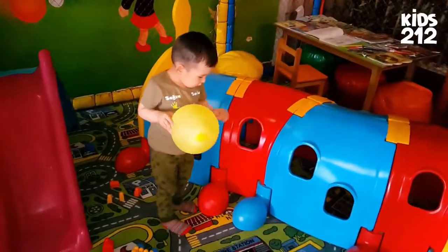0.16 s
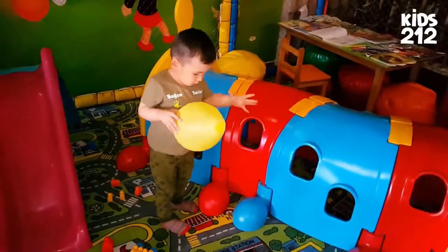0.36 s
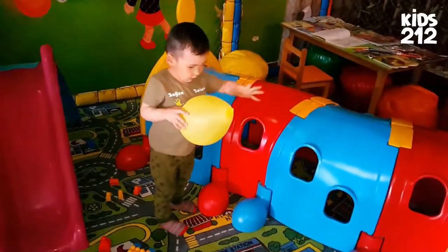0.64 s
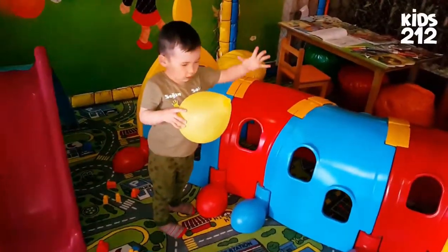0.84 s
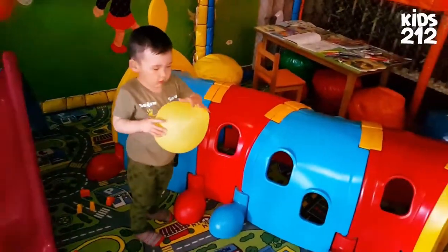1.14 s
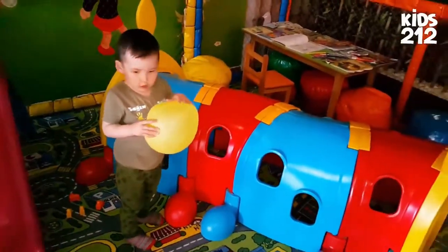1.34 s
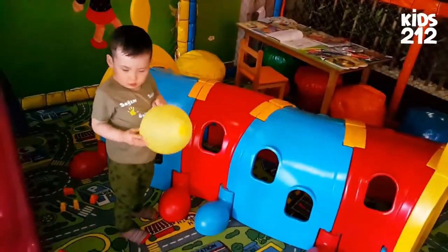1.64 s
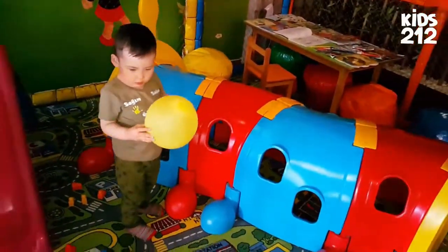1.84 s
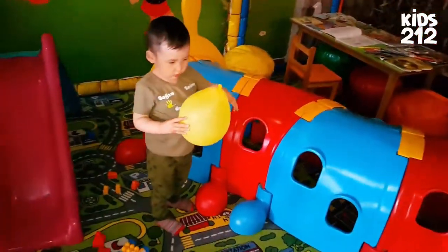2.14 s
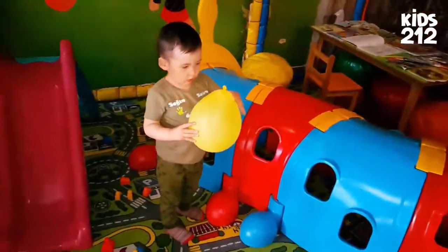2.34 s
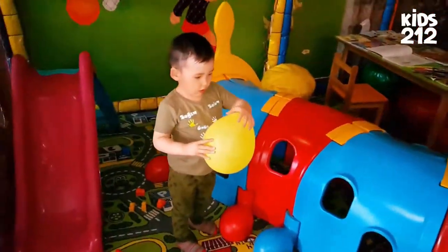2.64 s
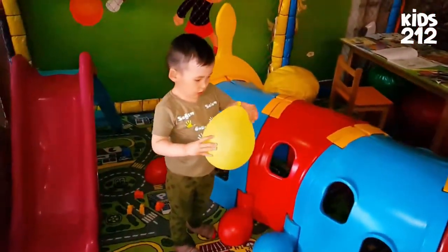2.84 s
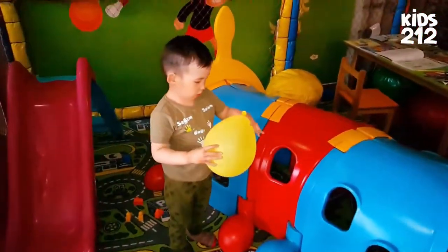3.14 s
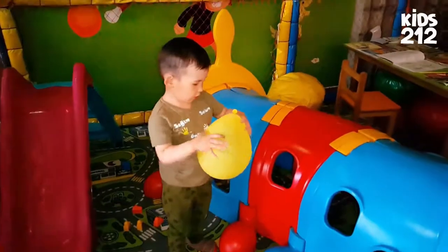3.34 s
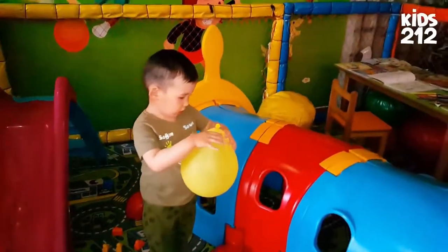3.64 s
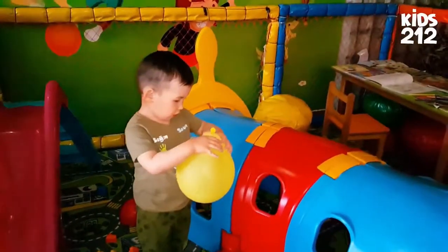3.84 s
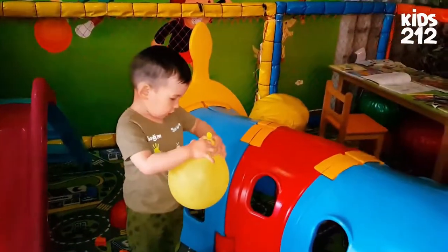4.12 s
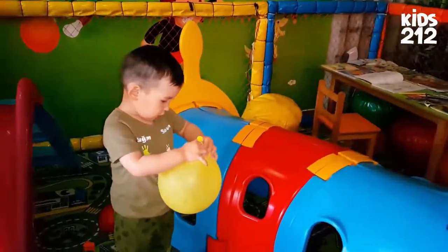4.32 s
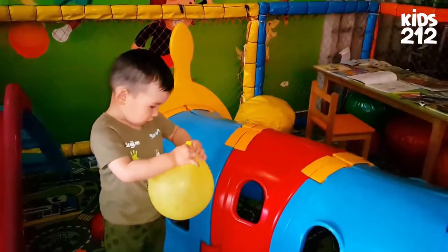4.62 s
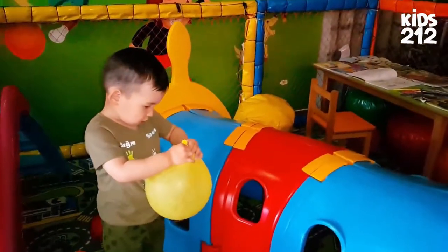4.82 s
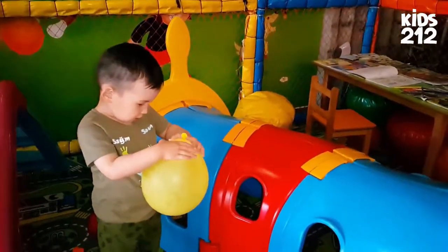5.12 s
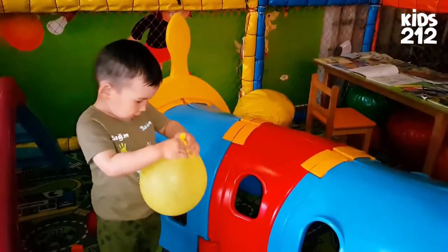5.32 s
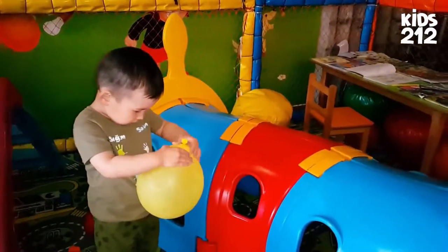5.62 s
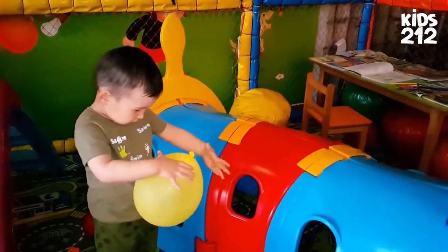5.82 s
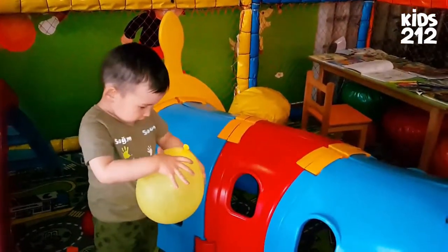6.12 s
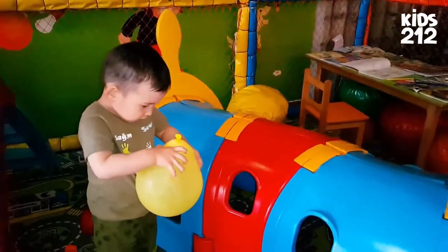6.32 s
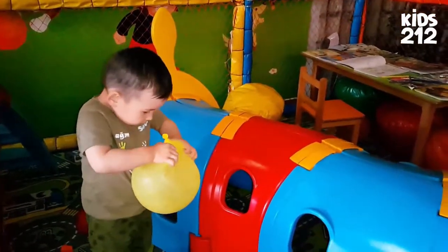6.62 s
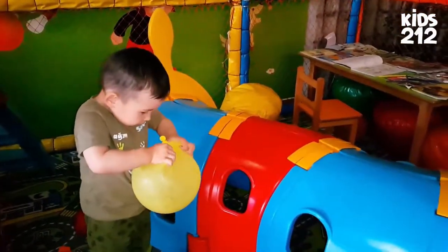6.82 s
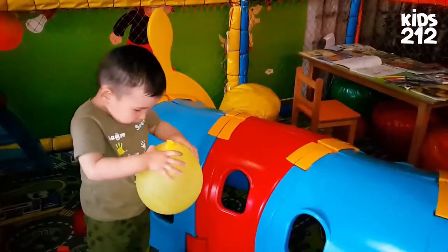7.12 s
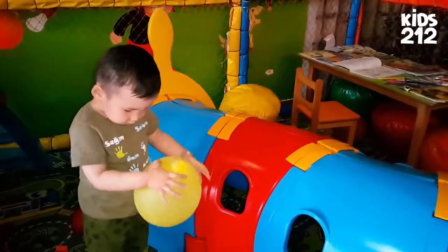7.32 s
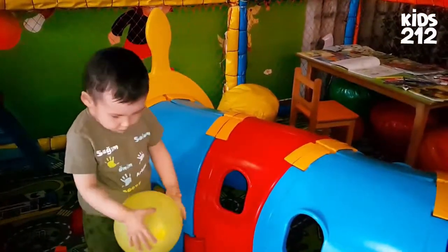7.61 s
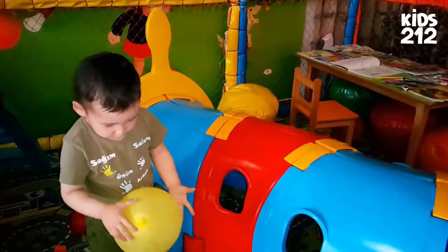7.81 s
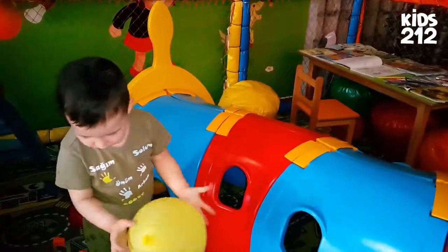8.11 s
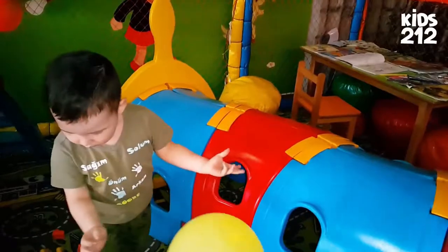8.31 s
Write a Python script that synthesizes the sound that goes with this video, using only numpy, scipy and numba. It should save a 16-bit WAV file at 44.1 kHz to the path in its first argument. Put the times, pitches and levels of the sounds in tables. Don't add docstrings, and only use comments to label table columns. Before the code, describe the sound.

A firm pat dies away, then near quiet. Fingers creak on a taut rubber balloon, building to a loud, hollow thump. Faint squeaks and soft pats follow, then a sharp scratchy burst with a hoarse squeak, scattered chirps and dry rubs, and another booming knock. Close stereo microphone, brighter on the left, in a small hard-walled playroom with a faint low murmur.

```python
import sys
import numpy as np
from scipy import signal
from scipy.fft import rfft, irfft, next_fast_len
from scipy.io import wavfile
from scipy.ndimage import uniform_filter1d
from numba import njit

SR = 44100
rng = np.random.default_rng(int(sys.argv[2]) if len(sys.argv) > 2 else 0)


def gain_from_decibels(decibels):
    exponent = np.asarray(decibels, float) / 20
    return 10 ** exponent


def put_to_file(sound):
    columns = np.atleast_2d(sound).T
    safe = np.clip(columns, -1, 1)
    whole_steps = np.round(safe * 32767)
    wavfile.write(sys.argv[1], SR, whole_steps.astype(np.int16))


N = 373071
LEAD = SR // 4


def at_hz(points, hz):
    f, v = np.transpose(points)
    return np.interp(np.log(np.maximum(hz, 1)), np.log(f), v)


def rms_one(x):
    return x / np.sqrt(np.mean(x ** 2) + 1e-20)


def shape(x, points):
    size = next_fast_len(x.shape[-1], True)
    hz = np.arange(size // 2 + 1) * SR / size
    return irfft(rfft(x, size) * gain_from_decibels(at_hz(points, hz)), size)[..., :x.shape[-1]]


def butter(x, order, hz, kind="low"):
    return signal.sosfilt(signal.butter(order, hz, kind, fs=SR, output="sos"), x)


def low_part(x, hz):
    return signal.sosfiltfilt(signal.butter(2, hz, fs=SR, output="sos"), x)


def peak(x, hz, width_hz):
    r = np.exp(-np.pi * width_hz / SR)
    poles = [1, -2 * r * np.cos(2 * np.pi * hz / SR), r * r]
    return signal.lfilter([(1 - r * r) / 2, 0, (r * r - 1) / 2], poles, x)


@njit
def moving_peak(x, turn, r):
    y = np.zeros(len(x))
    for i in range(2, len(x)):
        drive = (1 - r[i] ** 2) / 2 * (x[i] - x[i - 2])
        y[i] = drive + 2 * r[i] * np.cos(turn[i]) * y[i - 1] - r[i] ** 2 * y[i - 2]
    return y


def flutter(size, per_s):
    knots = int(size * per_s / SR) + 2
    return np.interp(np.arange(size) * per_s / SR, np.arange(knots), rng.standard_normal(knots))


def add_at(out, s, burst):
    out[..., LEAD + round(s * SR):][..., :burst.shape[-1]] += burst


# frequency in Hz, side minus mid in dB.
DIFFUSE_SIDE_DB = [(60, -12), (110, -15.5), (200, -15.5), (380, -7.5), (700, -1.5), (1290, 2), (2380, 0.5),
                   (4400, -1), (8120, -1), (15000, 2)]


def diffuse(mid, side):
    side = shape(side, DIFFUSE_SIDE_DB)
    return np.array([mid + side, mid - side])


# frequency in Hz, level in dB per Hz.
MURMUR_COLOUR = [(20, -30), (40, -20), (80, 0), (130, -1.5), (230, 4), (330, -0.5), (500, -6.5),
                 (800, -6.5), (1300, -9.5), (2500, -14.5), (4500, -22), (8000, -34.5), (16000, -31.5)]
# time in seconds, level in dB.
MURMUR_LEVEL_DB = [(0, -75), (1.2, -68.5), (2.098, -68.5), (3.002, -66), (3.798, -59.5), (4.6, -61),
                   (5.5, -62), (6.398, -63), (7.499, -61), (8.46, -66.5)]


def murmur():
    noise = rms_one(diffuse(*shape(rng.standard_normal((2, N)), MURMUR_COLOUR)))
    low = low_part(noise, 420)
    knots = np.arange(0, N + 4000, 4000)
    breath = np.interp(np.arange(N), knots, rng.standard_normal(len(knots)))
    s, db = np.transpose(MURMUR_LEVEL_DB)
    swell_db = np.interp(np.arange(N) / SR, s, db - db[0]) + 0.72 * breath
    upper_db = 3.5 + 0.74 * swell_db
    return gain_from_decibels(db[0] - 1.0) * (low * gain_from_decibels(swell_db) + (noise - low) * gain_from_decibels(upper_db))


# frequency in Hz, left minus right port in dB.
PORT_BALANCE_DB = [(100, -3.5), (500, 0.5), (1500, 1.5), (3000, 0), (6000, 11), (10000, 13), (15000, 7)]
# frequency in Hz, decay time t60 in seconds.
WALL_T60 = [(100, 1), (260, 0.5), (700, 0.4), (1840, 0.37), (4850, 0.34), (12800, 0.34)]


def playroom(x):
    onset_ms = 2.0
    t = np.arange(SR) / SR
    white, tail = rng.standard_normal((2, SR)), 0
    edges = np.geomspace(40, 19000, 15)
    for low, high in zip(edges, edges[1:]):
        t60 = at_hz(WALL_T60, np.sqrt(low * high))
        decay_db = -40 * t / t60 - 324 * t ** 2
        tail = tail + butter(white, 2, [low, high], "band") * gain_from_decibels(decay_db)
    tail = tail * np.clip(t * 1000 / onset_ms - .5, 0, 1)
    tail = diffuse(*(tail / np.sqrt(np.sum(tail[0] ** 2))))
    tail[1] = shape(tail[1], np.array(PORT_BALANCE_DB) * [1, -.8])
    return signal.fftconvolve(x[None], tail, axes=1)[:, :len(x)]


def ports(x):
    lag_samples = 4
    half = np.array(PORT_BALANCE_DB) * [1, .5]
    right = np.roll(shape(x, half * [1, -1]), lag_samples)
    return np.array([shape(x, half), right])


# frequency in Hz, width in Hz, level in dB.
BALLOON_MODES = [(290, 30, 4.5), (415, 21, 10), (488, 13, -2), (715, 22, 13), (826, 15, 7),
                 (1010, 260, -13.5), (1900, 37, -3.5), (2400, 150, -22), (3662, 140, -37),
                 (4720, 2700, -13)]


def body(x):
    x = butter(x, 1, 150, "high")
    modes = 0
    for k, (hz, width_hz, db) in enumerate(BALLOON_MODES):
        modes = modes + gain_from_decibels(db - 10.0) * peak(x, hz, width_hz) * (-1) ** k
    return x + modes


# start in seconds, length in seconds, level in dB, frequency in Hz, width in Hz.
FINGERTIP_SQUEALS = [(0.932, 0.076, -66, 8050, 900), (1.941, 0.0055, -37.5, 3360, 760),
                     (2.345, 0.07, -72, 8000, 1300), (2.345, .05, -68, 15000, 900),
                     (2.482, 0.077, -59.5, 6310, 1600), (2.48, 0.066, -58, 14800, 3200),
                     (2.482, 0.074, -61, 8100, 1300), (2.48, 0.065, -58.5, 13300, 3000),
                     (2.849, 0.03, -77.5, 14900, 760), (2.854, 0.049, -72.5, 7720, 900),
                     (5.508, 0.035, -60.5, 11500, 5000), (3.705, 0.08, -74, 15000, 900),
                     (3.178, 0.019, -42.5, 4930, 760), (6.912, 0.051, -48, 6030, 760),
                     (8.2, .06, -56.5, 2900, 760), (6.988, 0.023, -49.5, 3900, 760),
                     (6.5, 0.055, -46.5, 4550, 760), (6.5, 0.059, -52.5, 5590, 780),
                     (7.655, .04, -57.5, 4550, 760), (1.2, .07, -50, 4395, 760)]


def squeals():
    out = np.zeros(LEAD + N + SR)
    t = np.arange(8192) / SR
    for s, length_s, db, hz, width_hz in FINGERTIP_SQUEALS:
        band = peak(peak(rng.standard_normal(8192), hz, width_hz), hz, width_hz)
        swell = np.clip(t / 0.012, 0, 1) * np.exp(-(t / length_s) ** 2)
        add_at(out, s, gain_from_decibels(db) * rms_one(band) * swell)
    return out


# start in seconds, level in dB, frequency in Hz, t60 in seconds.
AIR_BOOMS = [(1.465, -33, 422, 0.21), (1.503, -24.5, 435, 0.26), (1.59, -8.5, 415, 0.34),
             (1.59, -17, 826, 0.38), (1.592, -19.5, 290, 0.36), (1.6, -28.5, 112, 0.18),
             (7.04, -21.5, 480, 0.15), (7.088, -10, 487, 0.25), (7.09, -22, 415, 0.23),
             (7.09, -35.5, 90, 0.23), (5.458, -38, 513, 0.32), (5.458, -31.5, 960, 0.19),
             (5.46, -43, 187.5, .2), (3.688, -50, 700, 0.14), (3.762, -41, 630, 0.19),
             (3.85, -58, 588, 0.98), (4.304, -31.5, 705, 0.081)]


def booms():
    out = np.zeros(LEAD + N + SR)
    t = np.arange(SR // 2) / SR
    for s, db, hz, t60 in AIR_BOOMS:
        width_hz = hz * .22
        band = peak(peak(rng.standard_normal(len(t)), hz, width_hz), hz, width_hz)
        add_at(out, s, gain_from_decibels(db - 3.0 - 60 * t / t60) * np.clip(t / 0.0044, 0, 1) * rms_one(band))
    return out


# start in seconds, length in seconds, level in dB, first and last slip rate in Hz.
SKIN_SINGS = [(1.196, 0.094, -52, 1034, 1040), (4.655, 0.083, -25.5, 1176, 1128),
              (4.73, .05, -31.5, 947, 1000), (4.948, .022, -46, 2293, 1784),
              (4.964, 0.045, -43, 1900, 2535), (6.6557, .007, -20.5, 994, 964),
              (5.164, 0.029, -46.5, 1076, 981), (5.809, 0.029, -36, 1058, 996),
              (7.401, 0.043, -39, 953, 1270), (7.468, 0.075, -38, 1232, 1359), (4.66, .12, -38, 770, 721),
              (7.561, 0.07, -41.5, 4610, 4320), (7.985, 0.037, -44.5, 1144, 1640),
              (8, 0.02, -48, 1790, 2200), (8.012, 0.028, -50.5, 1900, 2290),
              (3.305, 0.045, -64.5, 2540, 2370)]
SING_PARTIAL_LEVELS = [3.5, 1.5, -7, -17.5, -21.5]


def sings():
    waver, lumps_db = 0.055, 7.5
    out = np.zeros(LEAD + N + SR)
    t = np.arange(6144) / SR
    for s, length_s, db, first_hz, last_hz in SKIN_SINGS:
        share = np.clip(t / length_s, 0, 1)
        hz = (first_hz + (last_hz - first_hz) * share) * (1 + waver * flutter(6144, 600))
        phase = 2 * np.pi * np.cumsum(hz) / SR
        note = np.zeros(6144)
        for k, partial_db in enumerate(SING_PARTIAL_LEVELS, 1):
            if k * first_hz < 9000:
                note += gain_from_decibels(partial_db + lumps_db * flutter(6144, 250)) * np.sin(k * phase)
        add_at(out, s, gain_from_decibels(db) * rms_one(note) * np.sin(np.pi * share).clip(0) ** 0.36)
    return out


# start in seconds, peak level in dB, ring frequency in Hz, ring time in ms.
SKIN_JERKS = [(1.4491, -12, 1510, 2.0), (1.4648, -14, 1300, 2.0), (1.4762, -11, 1560, 1.8),
              (1.5013, -6, 1280, 2.3), (1.5034, -6, 2310, 2.5), (1.5056, -9, 1040, 3.0),
              (1.5405, -6, 800, 2.5), (1.5416, -9, 2230, 1.7), (1.5875, -3, 716, 60.0),
              (1.5995, -4, 826, 8.0), (3.3875, -24.5, 5800, 1.6), (3.3875, -33.5, 3400, 3.1),
              (3.3903, -27, 5600, 2.0), (4.304, -5.5, 2100, 1.0), (4.3066, -8, 1810, 1.1),
              (4.3092, -9, 1490, 1.3), (4.4115, -19.5, 1505, 1.5), (5.0268, -26, 1680, 2.0),
              (5.03, -24, 1800, 1.4), (5.0446, -27, 1810, 1.5), (5.049, -26, 1800, 1.5),
              (5.457, -22.5, 910, 1.5), (5.4595, -19, 950, 2.5), (5.4753, -27, 998, 1.9),
              (5.482, -25, 900, 3.0), (5.7715, -30, 2050, 1.5), (5.7791, -22, 2010, 1.6),
              (5.789, -25, 2000, 2.0), (5.7948, -22, 1900, 1.5), (5.7994, -22.5, 1950, 1.1),
              (5.8058, -25, 1950, 1.5), (5.812, -22, 1800, 1.5), (5.8188, -25, 1990, 2.0),
              (5.8462, -11.5, 1500, 1.0), (5.8497, -11, 1200, 1.2), (5.8523, -10.5, 2333, 4.0),
              (5.8536, -9, 1070, 3.0), (6.6135, -28, 1500, 2.5), (6.6305, -24, 1490, 2.0),
              (6.6578, -9, 1900, 3.4), (6.658, -12.5, 1100, 3.9), (6.6598, -14, 2880, 3.5),
              (6.678, -17, 1900, 2.0), (7.0744, -10, 560, 3.5), (7.0863, -4, 1150, 2.0),
              (7.0925, -2, 1952, 8.0), (7.8225, -50, 1200, 4.0)]
# multiple of the ring frequency, level in dB.
JERK_RING_PARTIALS = [(1.0, 0.0), (1.7, -10), (2.6, -13), (3.7, -18), (5.3, -24)]


def jerks():
    shorter, blur_ms = .65, 0.27
    out = np.zeros((2, LEAD + N + SR))
    t = np.arange(4096) / SR
    for s, db, hz, ms in SKIN_JERKS:
        partials = np.zeros(4096)
        for k, partial_db in JERK_RING_PARTIALS:
            if k * hz < 8000:
                partials += gain_from_decibels(partial_db) * np.sin(2 * np.pi * k * hz * t) * np.exp(-t * 300 * (k - 1))
        rings = []
        for tau_ms in (ms * shorter, blur_ms):
            swell = (1 - np.exp(-t * hz * 2.5)) * np.exp(-t * 1000 / max(tau_ms, .1))
            rings.append(swell / swell.max() * partials)
        rings[1] *= np.sqrt(min(ms, 3.0) * shorter / blur_ms)
        add_at(out, s, gain_from_decibels(db - 3.5) * np.array(rings))
    return butter(out + 1e-18, 2, 350, "high")


# strongest pressure in seconds, rise in seconds,
# fall in seconds, level in dB, skin resonance in Hz.
SQUEEZE_RUBS = [(1.6, 0.013, .05, -15, 744), (1.65, .05, 0.15, -16, 960), (1.485, .1, .03, -29, 2500),
                (4.306, 0.002, 0.03, -19, 1790), (4.34, .02, .06, -31.5, 1700),
                (5.459, 0.002, 0.073, -34.5, 950), (6.52, 0.049, 0.4, -42.5, 2300),
                (6.66, 0.003, .005, -26, 1780), (7.092, .02, .02, -4, 699.4),
                (7.14, .05, 0.12, -21.5, 1300), (3.692, .006, .12, -45, 2600), (3.775, .04, .12, -47, 1800),
                (5.67, .012, .1, -60, 3500)]
PALM_SWEEPS = [(1.21, 0.017, .12, -39.5, 2303), (1.255, 0.034, .04, -40, 2100),
               (1.44, .2, 0.0058, -39, 2171), (2.485, .01, 0.09, -61.5, 1996),
               (4.69, 0.052, 0.13, -20.5, 2400), (4.8, .05, 0.12, -36, 2202),
               (4.955, 0.008, 0.1, -45, 2237), (5.028, .004, .02, -39.5, 1800),
               (5.747, .006, 0.085, -45, 2116), (6.177, .006, .08, -42, 2099),
               (6.34, .05, 0.07, -52.5, 1824), (6.6, 0.097, 0.088, -38.5, 1994),
               (6.93, .02, 0.054, -56, 2960), (7.032, 0.0054, 0.14, -21, 1900),
               (7.505, .02, 0.12, -40, 1320), (7.62, .04, 0.027, -44, 4500),
               (7.67, 0.022, 0.048, -62, 4500), (8.01, .025, 0.08, -61, 2400), (3.69, .005, .03, -65, 2500),
               (3.78, .04, 0.06, -68.5, 1600), (3.875, .012, 0.05, -70, 2000),
               (3.56, 0.0092, 0.048, -59.5, 3500), (1.33, .06, 0.068, -43.5, 1200),
               (6.56, 0.059, 0.035, -37.5, 2500)]
LIGHT_STROKES = [(3.184, 0.019, .05, -38.5, 2399), (3.25, 0.024, .08, -48.5, 2302),
                 (3.046, 0.011, 0.064, -51, 1485), (3.0, .03, 0.085, -62.5, 1187),
                 (3.15, .04, 0.029, -52, 1309), (5.04, 0.031, 0.071, -39, 1700),
                 (5.095, .04, .03, -39.5, 2052), (6.2, 0.036, 0.035, -34.5, 2400),
                 (6.23, 0.026, 0.19, -48, 1676), (7.508, 0.044, 0.034, -34, 1343),
                 (7.585, 0.051, .07, -34, 5206)]
DAMP_SQUEAKS = [(2.27, 0.023, .05, -60.5, 2028), (2.4, 0.026, 0.049, -50.5, 2483),
                (2.78, .01, .08, -62, 1584), (3.31, 0.022, .05, -49, 2650), (3.45, 0.013, .1, -52, 1304),
                (3.772, .02, 0.037, -45, 659.6), (4.965, .02, .04, -47.5, 2510),
                (5.03, 0.01, .04, -38.5, 1789), (5.172, 0.015, .03, -51, 1197),
                (5.782, 0.033, .06, -36.5, 2150), (5.822, .06, .03, -35, 2096),
                (7.418, .02, .02, -35, 2300), (7.432, .02, 0.044, -37.5, 2400),
                (8.04, .03, 0.098, -46.5, 2598)]


def pressure(size):
    fade_db, eased_hiss_db_per_db = 20, 0.31
    kinds = [(SQUEEZE_RUBS, -23.5, -7), (PALM_SWEEPS, -1, -8.5),      # rows, hiss dB, squeak dB
             (LIGHT_STROKES, -14.5, 8.5), (DAMP_SQUEAKS, -32, 25)]
    t = (np.arange(size) - LEAD) / SR
    level, bright, squeak = np.zeros((3, size))
    centre_hz = np.full(size, 1500.)
    for rows, hiss_db, squeak_db in kinds:
        for s, rise_s, fall_s, db, hz in rows:
            at = np.arange(*np.searchsorted(t, [s - rise_s, s + fall_s]))
            eased_db = fade_db * np.maximum((s - t[at]) / rise_s, (t[at] - s) / fall_s)
            finger_hiss_db = db + hiss_db - (1 - eased_hiss_db_per_db) * eased_db
            bright[at] = np.maximum(bright[at], gain_from_decibels(finger_hiss_db))
            leads = gain_from_decibels(db - eased_db) > level[at]
            at, eased_db = at[leads], eased_db[leads]
            level[at] = gain_from_decibels(db - eased_db)
            centre_hz[at] = hz
            squeak[at] = gain_from_decibels(squeak_db)
    return level * gain_from_decibels(-2), centre_hz, bright / np.maximum(level, 1e-9), squeak


def rubs():
    slips_per_s, lumps_db, broad_q, locked_q = 2500, 2.5, 1.0, 4.5
    size = LEAD + N + SR
    level, centre_hz, bright, squeak = pressure(size)
    catches = gain_from_decibels(lumps_db * flutter(size, 300))
    level = uniform_filter1d(level, 130) * catches
    grains = rms_one((rng.random(size) < slips_per_s / SR) * rng.choice([-1, 1], size))
    turn = 2 * np.pi * centre_hz / SR
    even = np.sqrt(1500 / centre_hz)

    def skin(ratio, q):
        w = np.minimum(ratio * turn, 2.5)
        r = np.exp(-w / 2 / q)
        return rms_one(even * moving_peak(moving_peak(grains, w, r), w, r))

    broad = skin(0.75, broad_q) - gain_from_decibels(-4.0) * skin(1.9, broad_q)
    scratch = rms_one(butter(broad, 2, 600, "high"))
    narrow = skin(0.909, locked_q) + gain_from_decibels(-13.5) * skin(1.4, locked_q) + gain_from_decibels(-9) * skin(0.43, locked_q)
    tone = level * (scratch + squeak * narrow) / np.sqrt(1 + squeak ** 2)
    hiss = level * bright * rms_one(grains + 0.67 * rng.standard_normal(size))
    return tone, hiss


# start in seconds, peak level in dB, chatter in Hz.
GRIP_CREAKS = [(1.2999, -30.5, 1480), (1.3169, -25, 2240), (1.3325, -26.5, 2250), (1.3484, -21, 2160),
               (1.3577, -24, 2200), (1.3756, -19.5, 2170), (1.3973, -20.5, 2220), (1.4024, -24, 1500),
               (1.4188, -18, 1490), (1.4285, -17, 1710), (1.449, -10, 1900), (1.4645, -11, 1700),
               (1.476, -8, 1900), (1.5103, -14, 1220), (1.5227, -14, 1413), (1.5405, -10, 903),
               (1.544, -17, 1630), (1.5569, -15, 2356), (4.8804, -31, 2383), (5.0452, -28, 1620),
               (5.0854, -25, 1842), (5.7884, -29.5, 1920), (5.7954, -26, 1950), (5.8007, -31, 2020),
               (5.807, -25, 1574), (6.484, -33.5, 1585), (6.7065, -20.5, 1910), (6.7493, -26, 2700)]
# start in seconds, peak level in dB, chatter in Hz, snap in dB.
PALM_PATS = [(-.12, 8, 868.4, -5.5), (-.07, 0, 596.5, -7), (0.16, -34.5, 1210, -24), (1.599, 8.5, 776, -5),
             (2.249, -42, 563, -6), (2.326, -36, 1216, -30), (2.379, -36, 2168, -39.5),
             (2.774, -39.5, 1340, -14.5), (2.961, -27.5, 1163, -49), (3.04, -25.5, 1410, -19),
             (3.306, -35.5, 2519, -11), (3.442, -32, 1135, -12), (3.69, -67, 2920, -23),
             (3.769, -20.5, 637, -22), (3.886, -28, 557, -23), (4.304, -10, 2722, -14),
             (5.458, -15, 886, -42), (7.094, 6.5, 527.2, -26.5), (7.347, -20, 661, -33),
             (7.822, -40, 1059, -23), (8.27, -47, 1500, -5)]
# start in seconds, peak level in dB, chatter in Hz, hiss in dB.
FINGERTIP_TICKS = [(1.206, -25.5, 4198, -10), (3.18, -20, 2342, -24.5), (3.247, -32.5, 1950, -20),
                   (3.3876, -37, 5830, -5.5), (4.198, -25.5, 4170, -13.5), (4.261, -31, 3775, -3.5),
                   (4.859, -19.5, 1550, -13.5), (4.951, -35, 2369, -17), (5.008, -32, 2316, -20.5),
                   (5.746, -36, 2022, -11), (6.175, -31.5, 2163, -21), (6.548, -25.5, 1944, -23.5),
                   (6.591, -22.5, 2578, -13), (6.613, -20.5, 1895, -8.5), (6.922, -33.5, 5760, -11),
                   (6.941, -30, 2975, -12.5), (6.992, -26.5, 2983, -11.5), (7.038, 0, 1185, -18),
                   (7.071, -4, 527, -19)]
# start in seconds, peak level in dB, chatter in Hz, snap in dB.
FIRM_SLIPS = [(1.501, 0, 1500, 2), (1.439, -14, 1500, -4), (1.541, -5.5, 801, 3), (1.587, 15.5, 721, -11),
              (4.411, -9, 1200, 2), (4.468, -20, 1836, -24), (4.535, -15.5, 1743, -11),
              (4.553, -13.5, 1839, -32), (4.588, -9.5, 1757, -39), (4.636, -9, 1388, -13),
              (5.025, -16.5, 1717, -40), (5.165, -24.5, 1036, -31.5), (5.772, -34, 1790, -10),
              (5.779, -27.5, 2020, -2), (5.846, -8.5, 1056, -30), (5.852, -10.5, 2355, -16),
              (5.936, -19.5, 715, -29), (6.184, -19.5, 2205, -21), (6.502, -25, 1710, -8),
              (6.629, -12, 1590, -1), (6.657, -4.5, 1900, -8), (6.677, -11.5, 2495, -24),
              (7.086, 5.5, 1157, 7), (7.489, -19, 1319, -13), (7.505, -13, 1350, 8)]


def contacts():
    creaks = [(s, db + 4, hz, -25, -22, -3.5, 0.45) for s, db, hz in GRIP_CREAKS]
    pats = [(s, db, hz, snap_db - 29, -14.5, snap_db, 1) for s, db, hz, snap_db in PALM_PATS]
    ticks = [(s, db, hz, hiss_db, -25, -4, 1) for s, db, hz, hiss_db in FINGERTIP_TICKS]
    firm = [(s, db, hz, -31, -36.5, snap_db, 1) for s, db, hz, snap_db in FIRM_SLIPS]
    return creaks + pats + ticks + firm


def slip_burst(drive, hz, q, thump_db, snap_db):
    ring = 0
    for k, db in ((1, 0.0026), (2, -7), (3, -16)):
        ring = ring + gain_from_decibels(db) * peak(drive, min(k * hz, 16000), hz / q) * (-1) ** k
    ring = rms_one(butter(ring, 4, min(hz * 5.0, 18000)))
    snap = rms_one(butter(drive, 3, [1700, 5000], "band"))
    push = rms_one(peak(peak(drive, 300, 740), 400, 700))
    return rms_one(ring + gain_from_decibels(snap_db) * snap) + gain_from_decibels(thump_db + 10.5) * push


def slips():
    jitter, rough, first_jerk_db, spread_db = 0.19, 0.1, 4.0, 6.5
    length_ms, longer_ms_per_db, shortest_ms = 14.6, 0.76, 5.5
    sharp_q, blurred_q = 2.8, 1.5
    tone, blurred, hiss = np.zeros((3, LEAD + N + SR))
    t = np.arange(4096) / SR
    for s, db, hz, hiss_db, thump_db, snap_db, share in contacts():
        wobble, size, grit = rng.standard_normal((3, 4096))
        ms = share * max(length_ms + longer_ms_per_db * db, shortest_ms)
        grip = (t > 0) * np.exp(-(t * 1000 / np.clip(ms, 1, 45)) ** 2.2)
        cycle = np.arange(4096) * hz / SR
        count = np.floor(cycle + jitter * wobble[cycle.astype(int)])
        chatter = (np.diff(count, prepend=0) > 0) * gain_from_decibels(spread_db * size)
        chatter[1] = gain_from_decibels(first_jerk_db)
        drive = (rms_one(chatter) + rough * grit) * grip
        pulse = 1e-9 * grit + (np.arange(4096) == 60)
        gain = gain_from_decibels(db - 16.0) * np.sqrt(np.mean(grip ** 2))
        add_at(tone, s, gain * slip_burst(drive, hz, sharp_q, thump_db, snap_db))
        add_at(blurred, s, gain * slip_burst(pulse, hz, blurred_q, thump_db, snap_db))
        add_at(hiss, s, gain_from_decibels(db + hiss_db - 1) * grip * (grit + .5 * rms_one(chatter)))
    return tone, blurred, hiss


# frequency in Hz, level in dB per Hz.
HISS_COLOUR = [(1500, -38.5), (3000, 2), (5000, 7.5), (7000, -6.5), (9000, -11.5), (12000, -14),
               (15500, -21.5), (20000, -20.5)]


def scene():
    slip_tone, slip_blur, slip_hiss = slips()
    rub_tone, rub_hiss = rubs()
    rub_tone = rub_tone + sings()
    boom = booms()
    jerk, jerk_blur = jerks()
    hiss = shape(slip_hiss + rub_hiss, HISS_COLOUR) * gain_from_decibels(5) + squeals()
    direct = gain_from_decibels(-0.5) * body(gain_from_decibels(-0.5) * slip_tone + rub_tone)
    direct = direct + gain_from_decibels(-1.0) * hiss + boom + jerk
    all_round = gain_from_decibels(-3) * body(gain_from_decibels(4.5) * slip_blur + rub_tone)
    all_round = all_round + gain_from_decibels(0.5) * hiss + gain_from_decibels(-4.0) * boom + gain_from_decibels(-8) * jerk_blur
    heard = ports(direct) + gain_from_decibels(-3.5) * playroom(all_round)
    return heard[:, LEAD:LEAD + N] + murmur()


def hush(x):
    gate_db, slope, depth_db, above_hz = -43.5, 0.4, 11.5, 616
    low = low_part(x, above_hz)
    power = uniform_filter1d(np.mean((x - low) ** 2, axis=0), 800)
    level_db = 10 * np.log10(power.clip(1e-14))
    return low + (x - low) * gain_from_decibels(-np.clip(slope * (gate_db - level_db), 0, depth_db))


def low_pass(x):
    return signal.sosfilt(signal.butter(12, 16190, fs=SR, output="sos"), x)


def record(dry):
    ceiling_db, release_db_per_s, depth, ahead_samples = -20, 80, 0.45, 450
    power = uniform_filter1d(np.mean(dry ** 2, axis=0), 200)
    level_db = 10 * np.log10(power.clip(1e-12))
    slope_db = release_db_per_s * np.arange(N) / SR
    held_db = np.roll(np.maximum.accumulate(level_db + slope_db) - slope_db, -ahead_samples)
    duck_db = uniform_filter1d(depth * np.maximum(held_db - ceiling_db, 0), 150)
    full = np.clip(1.136 * np.tanh(hush(dry) * gain_from_decibels(-duck_db) / 0.69), -1, 1)
    top = signal.cheby2(8, 25, 16200, fs=SR, output="sos")
    mix = signal.sosfiltfilt(top, full).clip(-1, 1)
    return low_pass(mix)


dry = scene()
out = record(dry)
put_to_file(out)
```